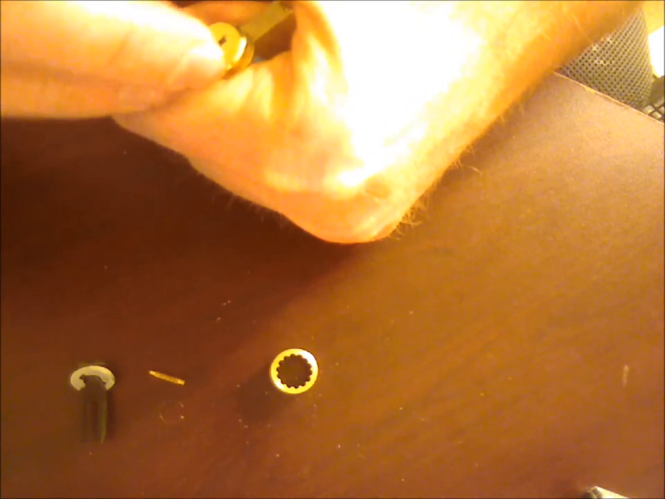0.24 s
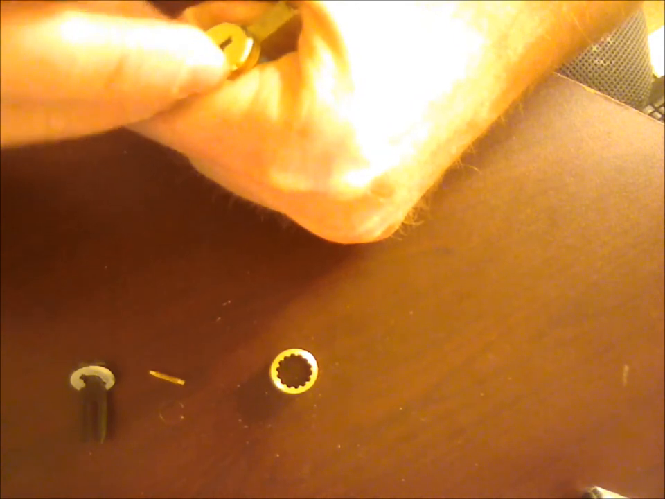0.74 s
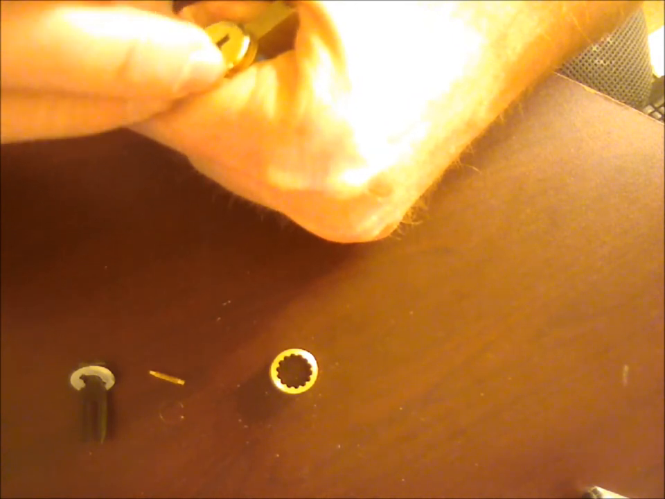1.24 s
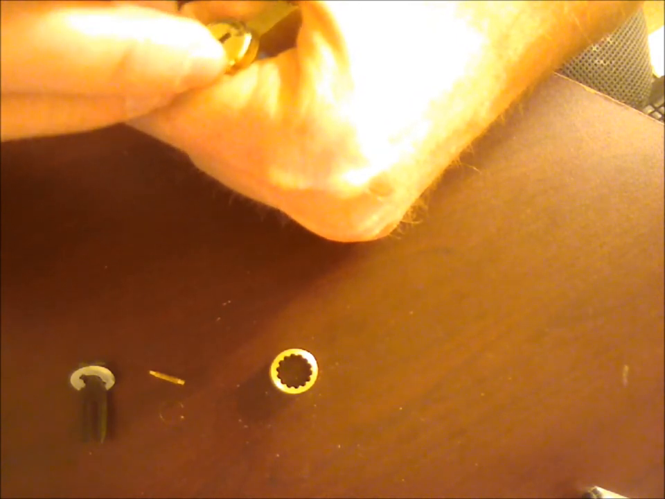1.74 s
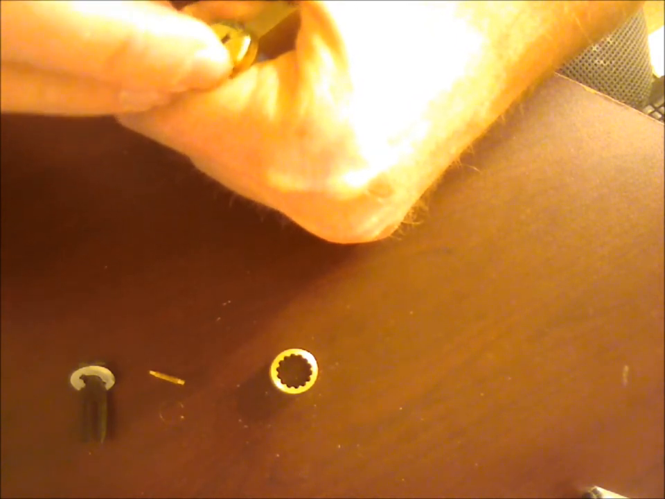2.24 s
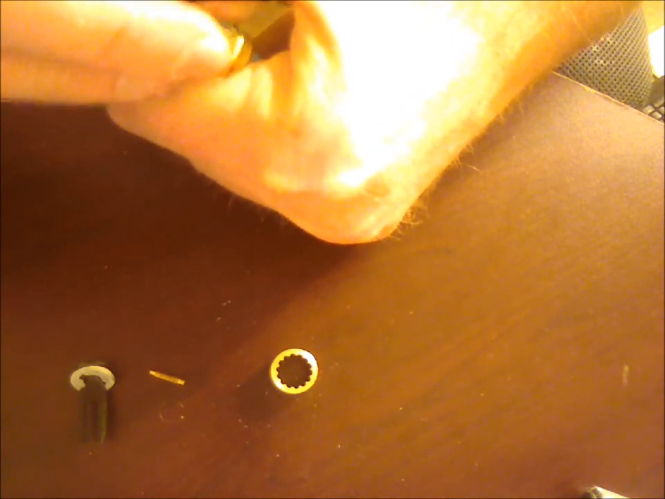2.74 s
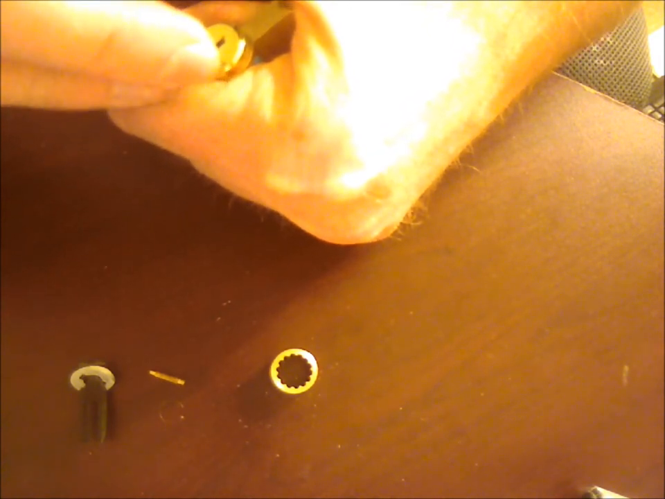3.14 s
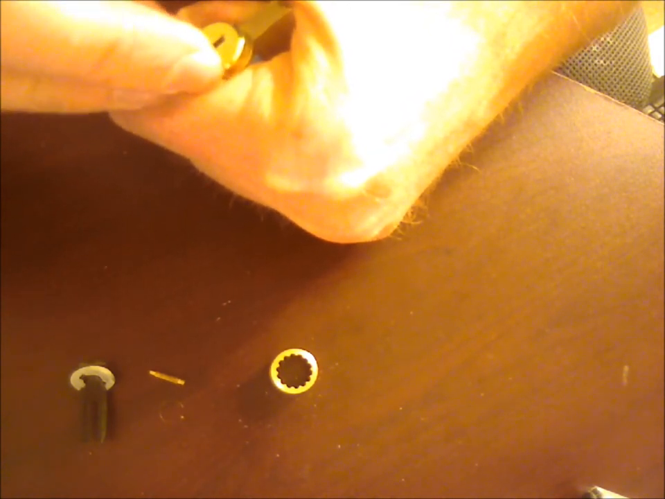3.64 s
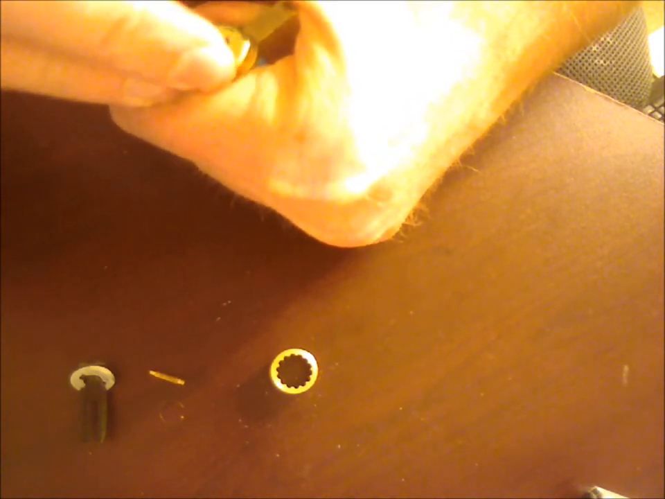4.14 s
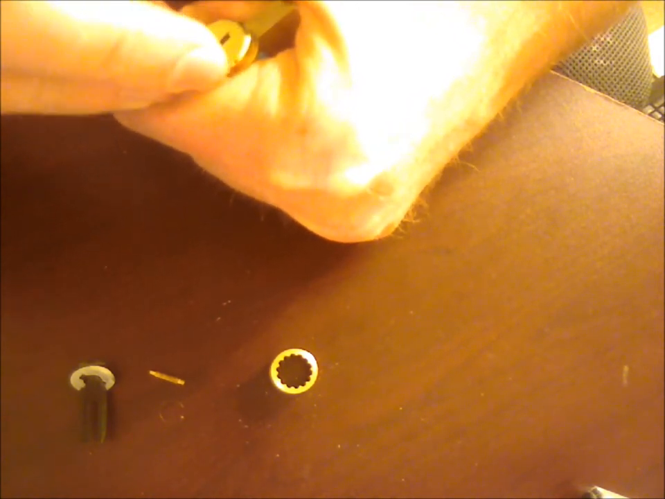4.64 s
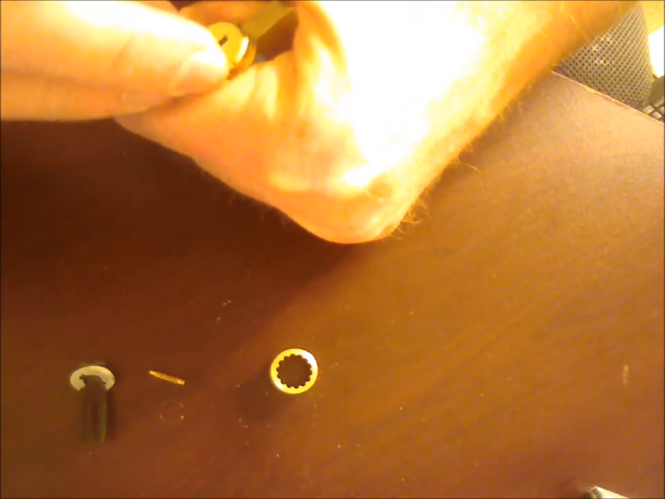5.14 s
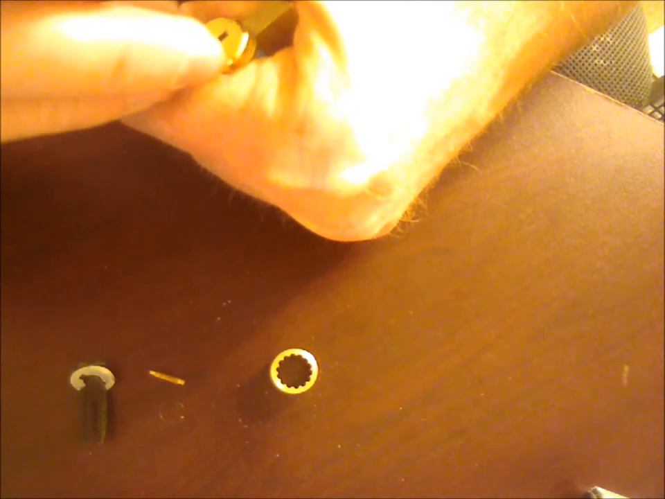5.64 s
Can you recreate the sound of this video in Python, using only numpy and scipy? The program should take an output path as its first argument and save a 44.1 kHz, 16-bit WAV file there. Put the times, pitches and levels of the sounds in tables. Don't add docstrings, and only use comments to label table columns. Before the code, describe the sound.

Lock picking at a desk: thin, high pin clicks with a duller body knock beneath, brief chattering scrapes and faint finger rubs. Clusters fall around one and two seconds, gaps follow, then an isolated snap at four and a final strong burst near six. A distant fan drones low and swells irregularly. The plain camera microphone is narrow, slightly gritty in the treble, with little room echo.

```python
import sys
import numpy as np
from scipy import signal
from scipy.fft import rfft, irfft
from scipy.io import wavfile
from scipy.ndimage import uniform_filter1d, minimum_filter1d

SR = 44100
rng = np.random.default_rng(int(sys.argv[2]) if len(sys.argv) > 2 else 0)


def gain_from_db(level_db):
    decades = np.asarray(level_db, float) / 20
    return 10 ** decades


def int16_out(signal):
    q = np.round(np.clip(np.atleast_2d(signal).T, -1, 1) * 32767)
    wavfile.write(sys.argv[1], SR, q.astype(np.int16))


N = 260631

# f/Hz, density/dB per Hz
FAN_AIR = [(25, -51), (45, -33.5), (65, -13), (100, -15), (140, -7), (240, -1), (370, -6.5), (760, -10.5),
           (1250, -17), (1500, -19.5), (1750, -25), (2600, -27.5), (4000, -30.5), (6000, -33.5),
           (7000, -36.5)]
FAN_AIR_DB = -60
# f/Hz, width/Hz, level/dB
FAN_HOUSING = [(135.3, 28, -68.5), (277.8, 8.6, -73), (449, 25, -69.5), (561.5, 11, -77.5), (774, 12, -78),
               (1103, 30, -78.5), (1379, 9, -76.5), (2744, 3.1, -92), (4670, 10, -93.5), (5530, 12, -96.5)]
# t/s, level/dB
SURGES = [(0.0, -53.5), (.16, -60.5), (.46, -57.5), (.76, -62.5), (1.19, -62.5), (1.38, -60.5),
          (1.859, -50), (2.52, -62), (2.68, -59.5), (3.179, -53), (3.31, -54), (3.48, -60), (4.95, -58.5),
          (5.2, -57.5)]
DRONE_HZ, DRONE_WIDTH_HZ, DRONE_DB, SURGE_S = 226, 12, -64, 0.088
MOTOR_HZ, MOTOR_DB = 775, -73

# t/s, level/dB, f/Hz
THUMPS = [
    (.797, -54, 118),
    (1.801, -63.5, 90),
    (3.211, -69, 81),
    (5.855, -55, 153),
]

# middle t/s, scrape level/dB, rub level/dB, length/s
SLIDES = [(0.108, -95, -85, 0.066), (0.342, -81, -80, 0.06), (0.807, -77, -78, 0.06),
          (1.027, -77.5, -86, 0.12), (1.167, -84.5, -74, 0.11), (1.673, -70.5, -86, 0.075),
          (1.775, -65, -65, 0.032), (2.006, -82.5, -85.5, 0.087), (2.62, -97.5, -84, 0.04),
          (2.949, -81, -84, 0.15), (3.21, -73.5, -80.5, .03), (3.27, -97, -84, 0.05),
          (3.447, -90.5, -88.5, 0.19), (3.983, -84, -80.5, 0.13), (4.13, -67, -72, 0.036),
          (4.775, -84, -86, 0.082), (5.342, -79, -88.5, 0.19), (5.503, -81.5, -93, 0.11),
          (5.882, -68, -64.5, 0.085)]
# middle t/s, scrape level/dB, length/s
CHATTER = [(0.967, -66, 0.016), (1.27, -66, 0.052), (1.547, -65.5, 0.047), (1.8, -43, .037),
           (2.124, -73, 0.026), (2.303, -75, .033), (2.42, -74, 0.043), (2.46, -68.5, 0.022),
           (2.57, -74.5, .032), (4.44, -66, 0.03), (5.15, -69, .058), (5.2, -47, 0.019),
           (5.606, -63.5, 0.035), (5.703, -71, 0.019), (5.769, -75, 0.074)]
CHATTER_RUB_DB = -19.5
# t/s, rub level/dB
SCUFFS = [
    (1.247, -58),
    (2.457, -69),
    (4.117, -52.5),
]
SCUFF_S, SCUFF_SCRAPE_DB = 0.011, -12
# f/Hz, width/Hz, level/dB
SCRAPE_RINGS = [(6230, 860, 3.5), (5300, 600, -10), (6560, 400, -8.5)]
RUB = (3500, 1794)

# peak t/s, peak level/dB, ring f/Hz, lock body and tension tool level/dB re peak
SNAPS = [(.7755, -54, 6990, -10, -12), (.9643, -33, 6210, -10, -13), (1.249, -34, 6380, -26, -19),
         (1.2752, -44, 6240, -38, -30), (1.7521, -26, 6210, -23, -21), (1.7866, -18, 6820, -12, -10),
         (4.126, -48, 6210, -4, -20), (4.4495, -46, 6300, -22, -34), (5.1916, -27, 5500, -13, -16),
         (5.1976, -46, 5860, -18, -14), (5.2025, -42, 5810, -17, -24), (5.8426, -24, 6040, -18, -20),
         (5.8532, -14, 6190, -18, -17), (5.8886, -28, 6060, -30, -19)]
# peak t/s, peak level/dB, ring f/Hz, lock body and tension tool level/dB re peak
TAPS = [(.3522, -50, 6270, -34, -23), (.7826, -36, 5810, -10, -16), (1.5546, -38, 6170, -42, -42),
        (1.8237, -29, 6320, -20, -12), (1.828, -20, 6180, -14, -15), (2.4598, -39, 6030, -24, -17),
        (2.4654, -48, 6300, -22, -21), (3.1999, -44, 6350, -25, -30), (3.2086, -46, 6690, -22, -25),
        (4.1164, -20, 6170, -17, -23), (4.4387, -43, 6420, -22, -32), (4.745, -39, 6180, -39, -35),
        (5.1137, -36, 6560, -13, -22), (5.2179, -41, 6170, -40, -26), (5.5957, -38, 6240, -42, -42),
        (5.6115, -40, 6440, -42, -33)]
# peak t/s, peak level/dB
TICKS = [(.5899, -57), (.9718, -52), (1.2555, -53), (1.2591, -52), (1.5305, -50), (1.5623, -55),
         (1.6764, -58), (1.8943, -48), (2.1078, -57), (2.1138, -61), (2.1199, -61), (2.4212, -63),
         (2.5637, -62), (2.5726, -55), (3.2022, -56), (3.9798, -63), (4.4441, -59), (5.1437, -55),
         (5.6011, -52), (5.6044, -54), (5.6075, -49), (5.6977, -54), (5.7029, -56), (5.7683, -58),
         (5.7725, -51)]
TICK_COLOUR = (6270, -26, -25)
SNAP_MS, TAP_MS, TICK_MS = 2.3, 1.6, 2.4
# f/Hz, width/Hz, level/dB
SIDE_RINGS = [(5180, 470, -8), (6910, 550, -8.5), (4610, 400, -23.5), (3830, 670, -25.5), (1486, 310, -30)]
BODY, TOOL = (2210, 870), (3170, 460)  # f/Hz, width/Hz
RING_WIDTH_HZ = 478
RATTLE = 0.16
SPREAD_DB_PER_MS = 4.5
SCATTER = .04
LAG_S = .0003
FILTER_S = .0005

# t/s, level/dB
ECHOES = [
    (.0052, -23),
    (.0098, -28),
    (0.0133, -32.5),
]
# f/Hz, t60/s
ROOM_DECAY = [(1000, 0.41), (3000, 0.13), (6000, 0.11), (8000, 0.065)]
ROOM_DB = -19

# f/Hz, step/dB
STEP = [(1000, -102), (1700, -97), (2600, -95), (4000, -97), (6500, -99)]
EDGE_HZ, WALL_HZ = 7200, 8050
SHORT_DB, SHORT_TOP_DB = 12, -36
STRAIN_DB = 6
BEND_DB = -43
HISS_DB, IMAGE_DB, MIRROR_HZ = -93.5, -51, 16000
WHINE_DB, WHINE_HZ = -102, (14500, 15600)
SPILL_DB = -56
SKIRT_DB, SKIRT_HZ = -46, (7400, 9600)


def evened(x):
    return x / np.sqrt(np.mean(x ** 2) + 1e-30)


def read(points, hz):
    f, value = np.transpose(points)
    return np.interp(np.log(hz + 1), np.log(f + 1), value)


def resonate(x, hz, width):
    return signal.lfilter(*signal.iirpeak(hz, hz / width, SR), x)


def add(mix, start, sound):
    part = mix[start:][:len(sound)]
    part += sound[:len(part)]


def swell(s, db, length):
    near = slice(max(round((s - 2 * length) * SR), 0), round((s + 2 * length) * SR))
    out = np.zeros(N)
    out[near] = gain_from_db(db) * np.exp(-(2 * (np.arange(N)[near] / SR - s) / length) ** 2)
    return out


def fan():
    noise = rng.standard_normal((len(FAN_HOUSING) + 2, N))
    air = irfft(rfft(noise[0]) * gain_from_db(read(FAN_AIR, np.fft.rfftfreq(N, 1 / SR))), N)
    housing = np.zeros(N)
    for v, (f, w, db) in zip(noise[2:], FAN_HOUSING):
        housing += gain_from_db(db) * evened(resonate(resonate(v, f, w), f, 3 * w))
    drone = resonate(resonate(noise[1], DRONE_HZ, DRONE_WIDTH_HZ), DRONE_HZ, 90)
    drone_level = gain_from_db(DRONE_DB) + sum(swell(s, db, SURGE_S) for s, db in SURGES)
    motor = gain_from_db(MOTOR_DB) * np.sin(2 * np.pi * MOTOR_HZ * np.arange(N) / SR)
    return gain_from_db(FAN_AIR_DB) * evened(air) + housing + motor + drone_level * evened(drone)


def desk():
    out, t = np.zeros(N), np.arange(3000) / SR
    for s, db, hz in THUMPS:
        add(out, round(s * SR), gain_from_db(db) * np.sin(2 * np.pi * hz * t) * np.exp(-t * hz / 3.9))
    return out


def strokes():
    unevenness = gain_from_db(3.5 * np.minimum(rng.exponential(1, N), 5))
    slips = rng.standard_normal(N) * unevenness * (rng.random(N) < .25)
    scrape = sum(gain_from_db(db) * evened(resonate(resonate(slips, f, w), f, 2 * w)) for f, w, db in SCRAPE_RINGS)
    rub = resonate(resonate(rng.standard_normal(N), *RUB), *RUB)
    moves = list(SLIDES)
    moves += [(s, db, db + CHATTER_RUB_DB, length) for s, db, length in CHATTER]
    moves += [(s, db + SCUFF_SCRAPE_DB, db, SCUFF_S) for s, db in SCUFFS]
    pick = sum(swell(s, db, length) for s, db, _, length in moves)
    skin = sum(swell(s, db, length) for s, _, db, length in moves)
    return pick * evened(scrape) + skin * evened(rub)


def click(hz, body_db, tool_db, contact_ms, chance):
    t = np.arange(len(chance)) / SR
    u = t / (contact_ms * 1.3e-4)
    push = u ** 4 * np.exp(-u)
    contact = chance * push
    shift = 1 + SCATTER * np.clip(chance[::-1], -2, 2)

    ring = evened(push * np.sin(2 * np.pi * hz * t))
    ring += RATTLE * evened(resonate(contact, hz, RING_WIDTH_HZ))
    side = np.zeros(len(t))
    for (f, w, db), k in zip(SIDE_RINGS, shift):
        side += gain_from_db(db) * evened(resonate(resonate(contact, f * k, w), f * k, 2 * w))
    top = ring + gain_from_db(SPREAD_DB_PER_MS * np.clip(contact_ms - 2.4, -1.5, 1)) * side

    sound = top / abs(top).max()
    heavy_shift = np.sqrt(shift[len(SIDE_RINGS):])
    for (f, w), k, db in zip((BODY, TOOL), heavy_shift, (body_db, tool_db)):
        drive = contact + push * np.sin(2 * np.pi * f * k * t)
        answer = np.roll(resonate(resonate(drive, f * k, w), f * k, 2 * w), round(LAG_S * SR))
        sound += gain_from_db(db) * answer / abs(answer).max()
    return np.argmax(abs(top)), sound


def lock():
    clicks = [(*row, SNAP_MS) for row in SNAPS]
    clicks += [(*row, TAP_MS) for row in TAPS]
    clicks += [(*row, *TICK_COLOUR, TICK_MS) for row in TICKS]
    clicks.sort()
    out, chance = np.zeros(N), rng.standard_normal((len(clicks), 1024))
    for (s, db, *colour), row in zip(clicks, chance):
        peak, sound = click(*colour, row)
        add(out, round((s - FILTER_S) * SR) - peak, gain_from_db(db + 2.0) * sound)
    return out


def room(x):
    hz, t, z = signal.stft(rng.standard_normal(SR // 2), SR, nperseg=128)
    decay = gain_from_db(-60 * t / read(ROOM_DECAY, hz)[:, None])
    tail = signal.istft(z * decay, SR, nperseg=128)[1]
    tail = tail * np.minimum(np.arange(len(tail)) / 260, 1)
    tail = gain_from_db(ROOM_DB) * tail / np.linalg.norm(tail)
    for s, db in ECHOES:
        tail[round(s * SR)] += gain_from_db(db)
    return signal.fftconvolve(x, tail)[:N]


def scene():
    clicks = lock()
    return (clicks + room(clicks) + strokes() + desk() + fan())[None]


def coarse(x, size, extra_db, top_db):
    hz, t, z = signal.stft(x, SR, window="cosine", nperseg=size, noverlap=size // 2)
    step = gain_from_db(read(STEP, hz)[:, None] + np.interp(t, np.arange(N) / SR, extra_db))
    step = np.maximum(step, gain_from_db(top_db) * abs(z).max(axis=0))
    z = step * np.round(abs(z) / step) * np.exp(1j * np.angle(z))
    return signal.istft(z, window="cosine", nperseg=size, noverlap=size // 2)[1][:N]


def low_pass(x):
    return signal.sosfilt(signal.butter(12, 15500, fs=SR, output="sos"), x)


def record(dry):
    x = signal.sosfilt(signal.cheby1(7, .5, EDGE_HZ, fs=SR, output="sos"), dry[0])
    x = signal.sosfilt(signal.ellip(8, .5, 60, WALL_HZ, fs=SR, output="sos"), x)

    treble = uniform_filter1d(resonate(x, 6000, 3000) ** 2, size=64)
    floor = minimum_filter1d(uniform_filter1d(treble, size=400), size=1500)
    attack = treble > 28 * uniform_filter1d(floor, size=400)
    near = 1. * (uniform_filter1d(1. * attack, size=900) > 1e-6)
    near = uniform_filter1d(near, size=500)

    strain_db = STRAIN_DB * uniform_filter1d(near, size=9000)
    share_db = 10 * np.log10(uniform_filter1d((1 - near) ** 2, size=4000) + .1)
    calm = coarse(x * (1 - near), size=6144, extra_db=strain_db + share_db, top_db=-60)
    busy = coarse(x * near, size=640, extra_db=strain_db + SHORT_DB, top_db=SHORT_TOP_DB)
    image = (calm + busy) * np.cos(2 * np.pi * MIRROR_HZ * np.arange(N) / SR)

    noise = rng.standard_normal((2, N))
    whine = signal.sosfilt(signal.butter(4, WHINE_HZ, "bandpass", fs=SR, output="sos"), noise[1])
    skirt = signal.sosfilt(signal.butter(3, SKIRT_HZ, "bandpass", fs=SR, output="sos"), noise[1])
    loud = np.sqrt(abs(uniform_filter1d(resonate(busy, 6000, 3000) ** 2, size=1400)))
    swollen = 1 + gain_from_db(SPILL_DB - HISS_DB) * loud

    out = calm + busy + gain_from_db(IMAGE_DB) * image + gain_from_db(BEND_DB) * busy ** 2
    out += gain_from_db(SKIRT_DB) * loud * evened(skirt)
    out += swollen * (gain_from_db(HISS_DB) * noise[0] + gain_from_db(WHINE_DB) * evened(whine))
    return low_pass(out[None])


dry = scene()
out = record(dry)
int16_out(out)
```